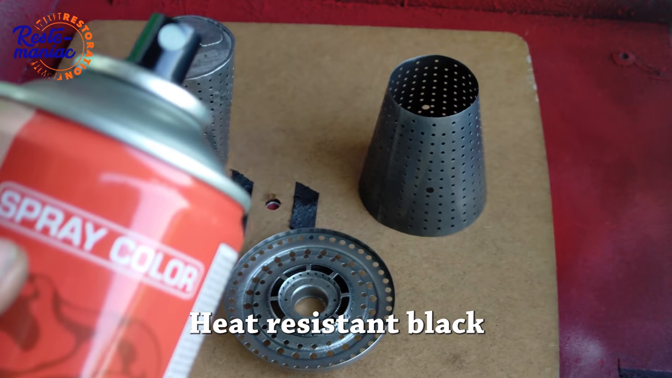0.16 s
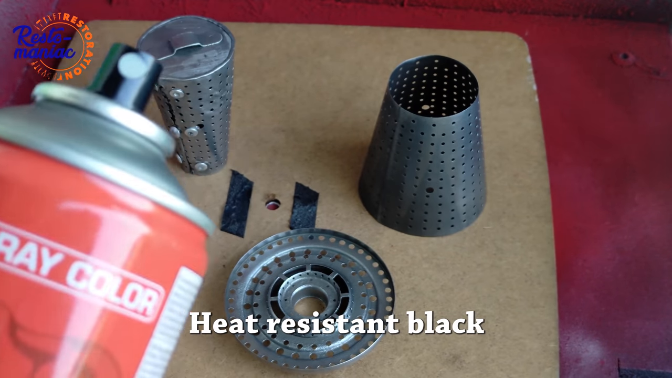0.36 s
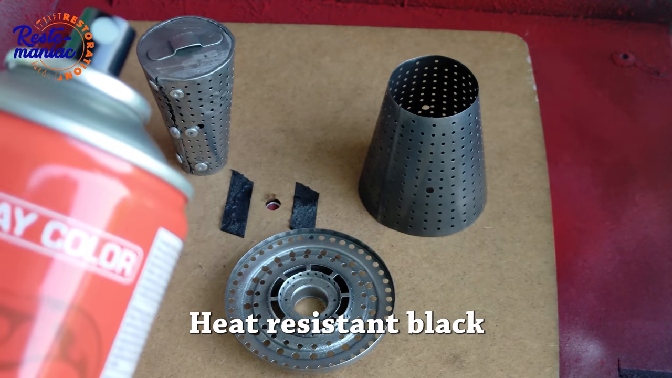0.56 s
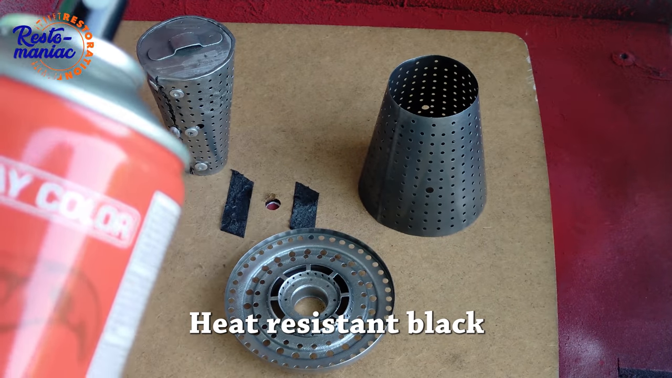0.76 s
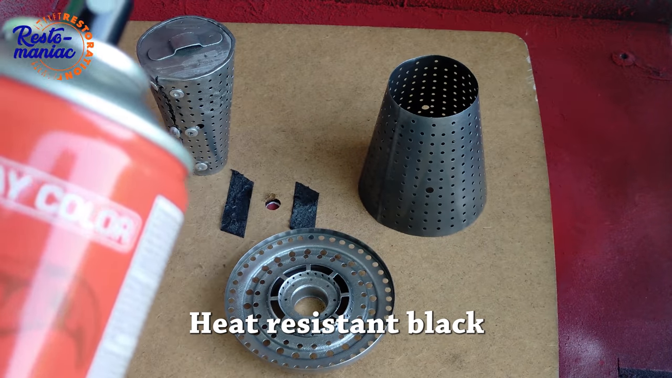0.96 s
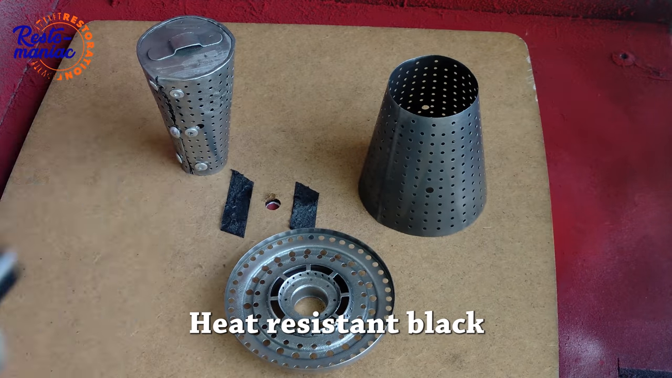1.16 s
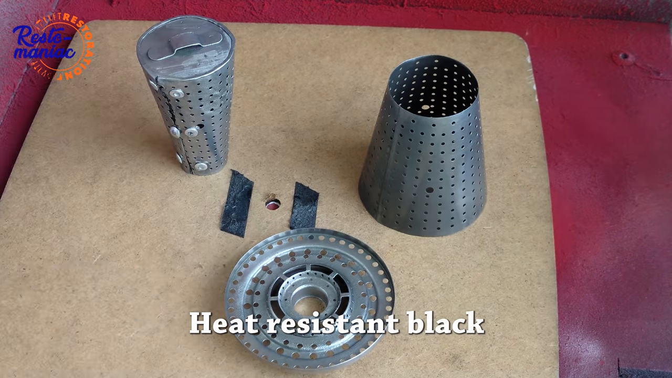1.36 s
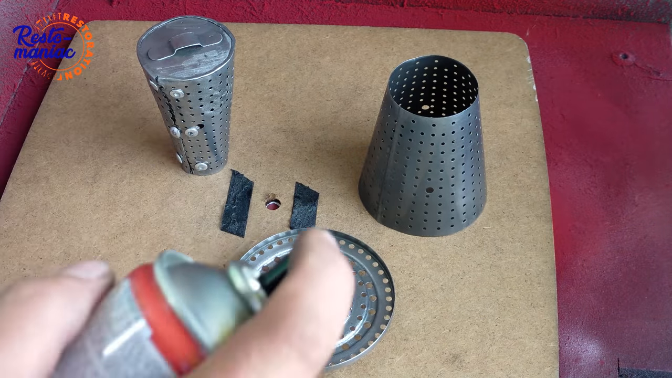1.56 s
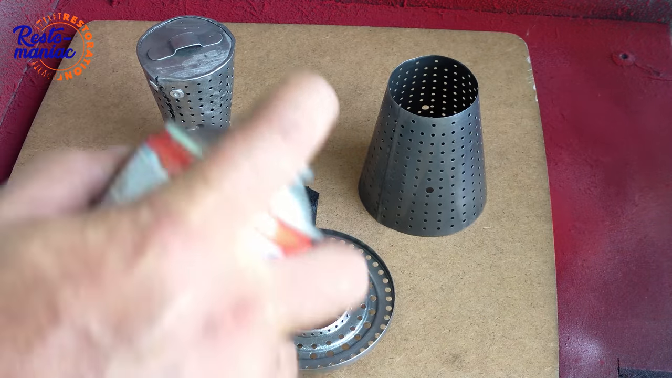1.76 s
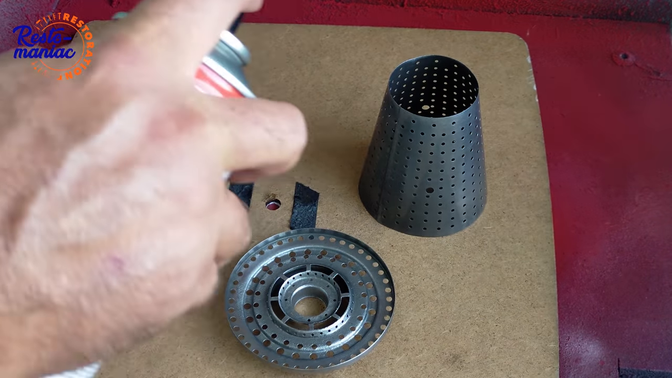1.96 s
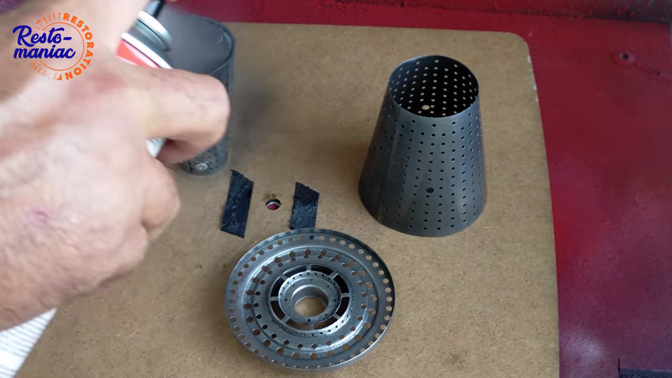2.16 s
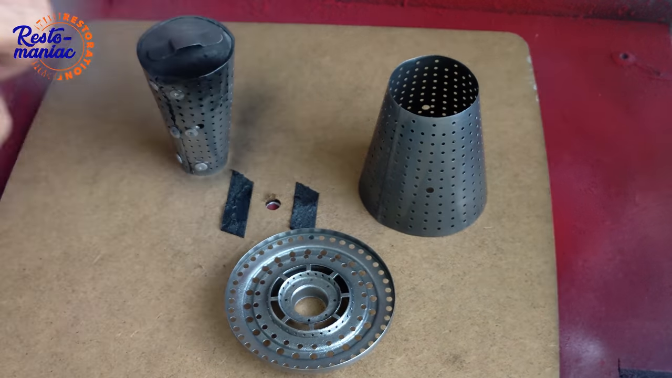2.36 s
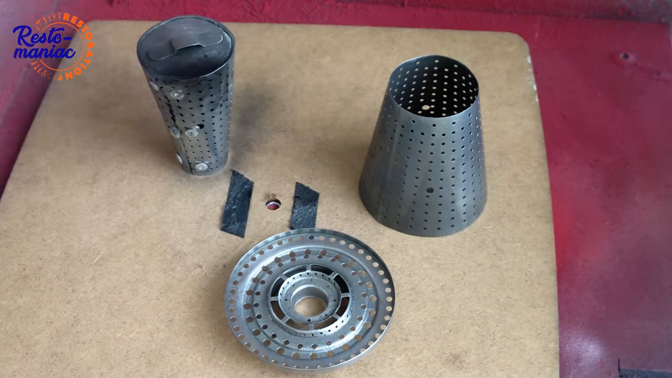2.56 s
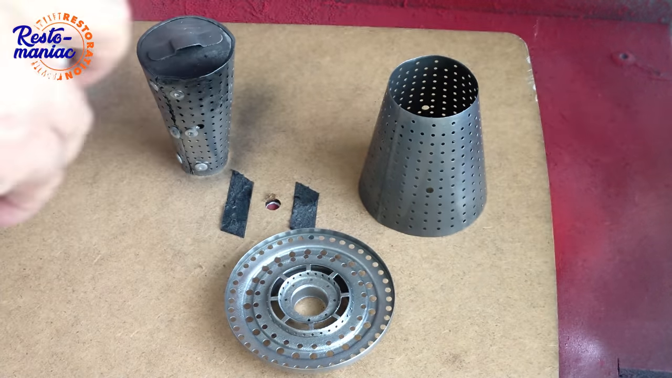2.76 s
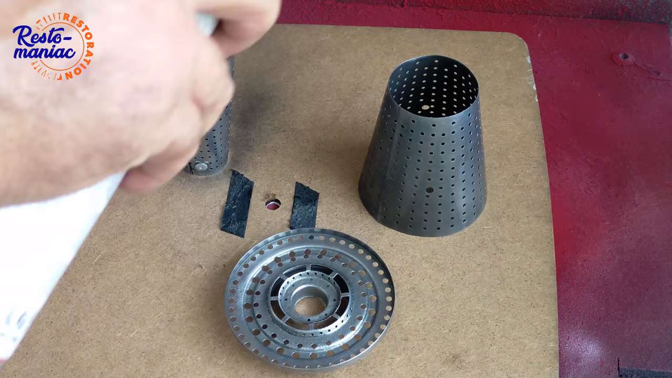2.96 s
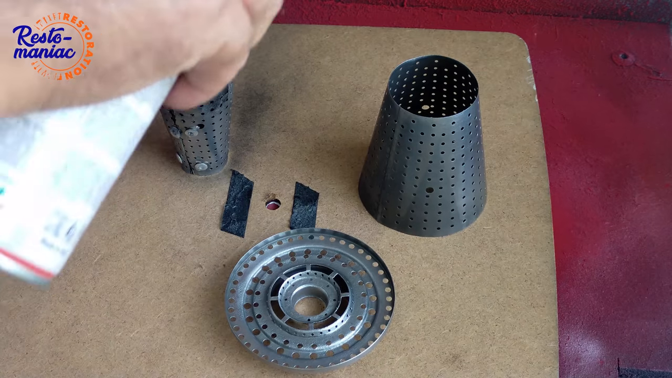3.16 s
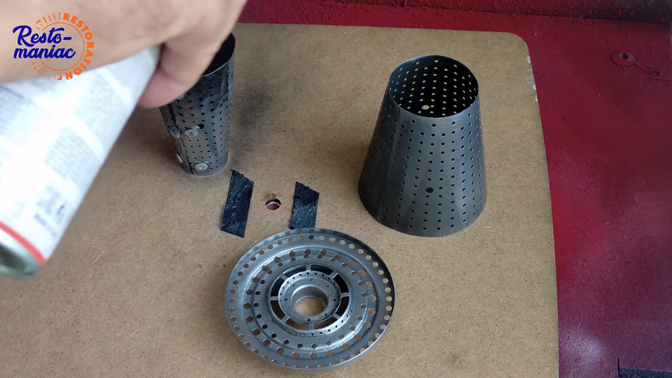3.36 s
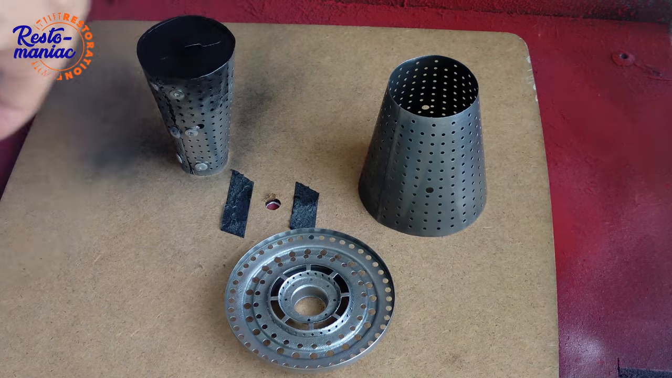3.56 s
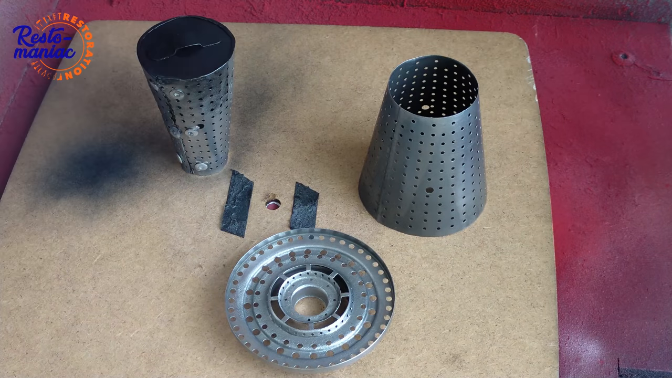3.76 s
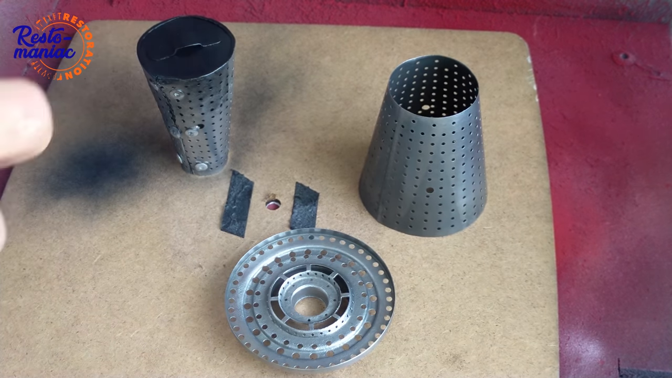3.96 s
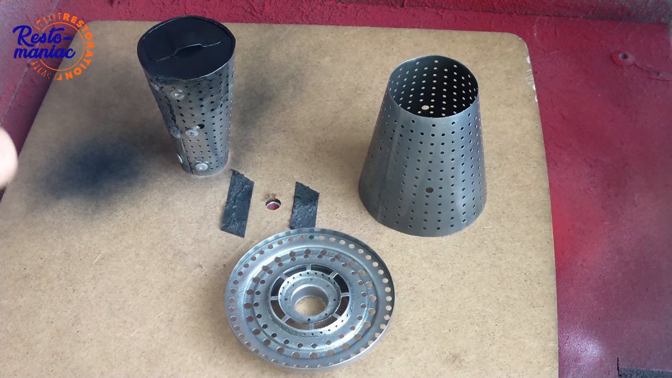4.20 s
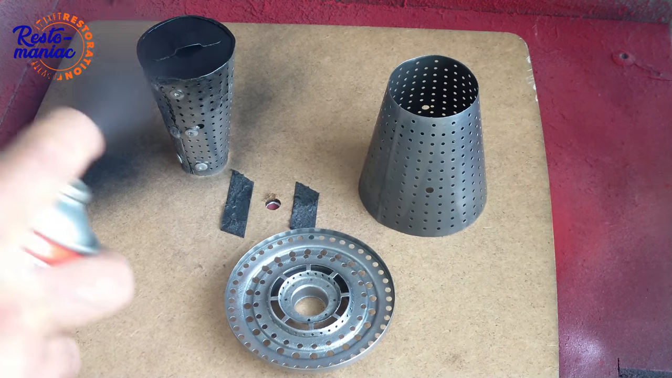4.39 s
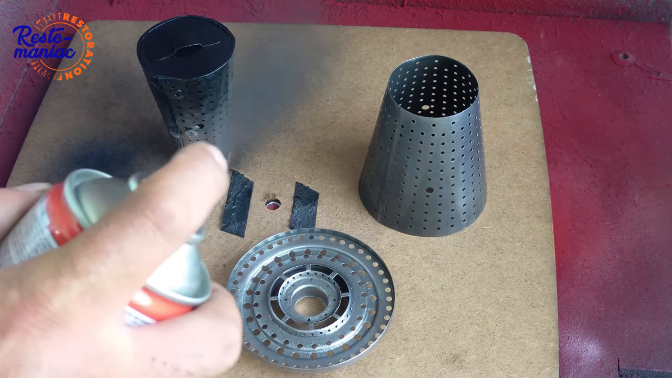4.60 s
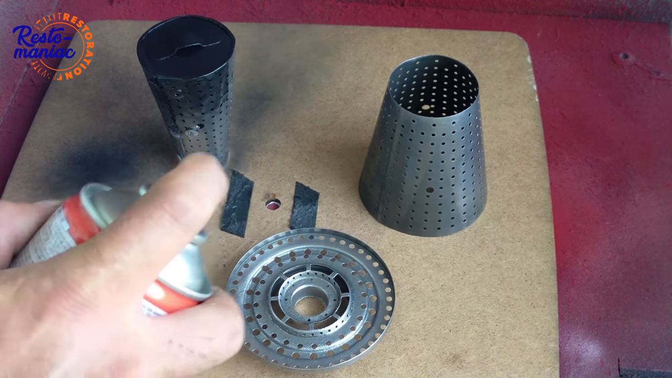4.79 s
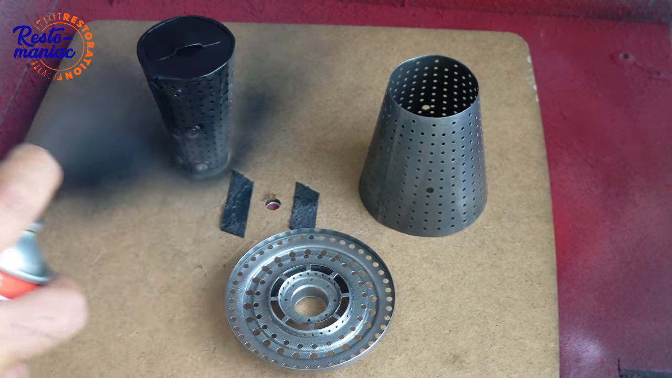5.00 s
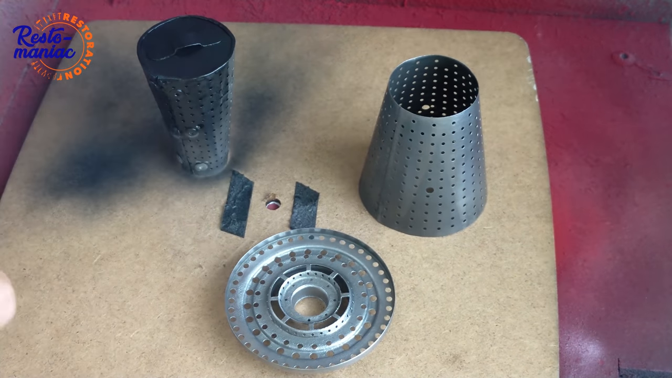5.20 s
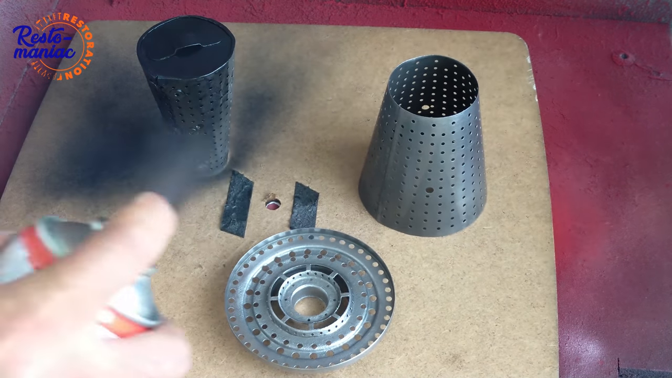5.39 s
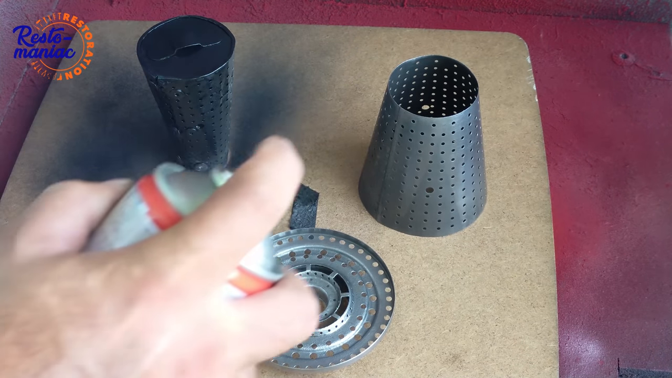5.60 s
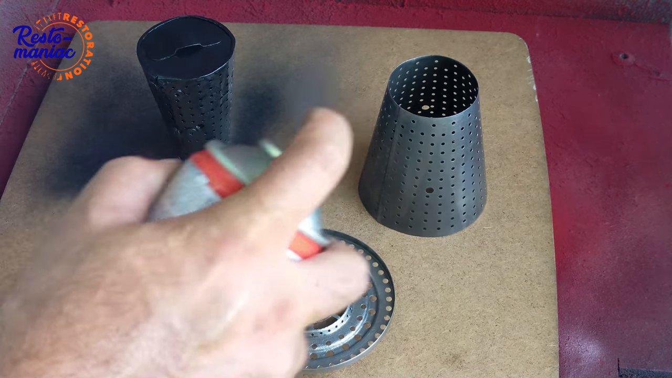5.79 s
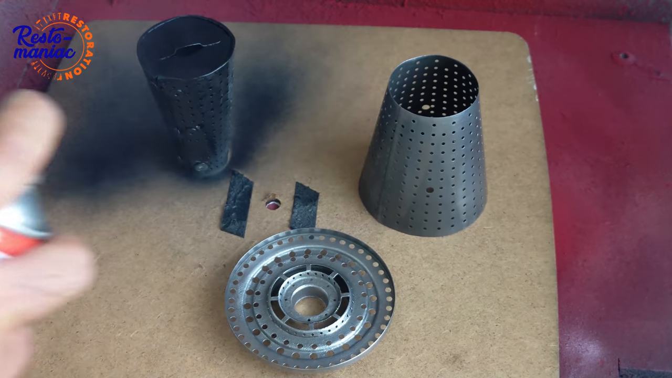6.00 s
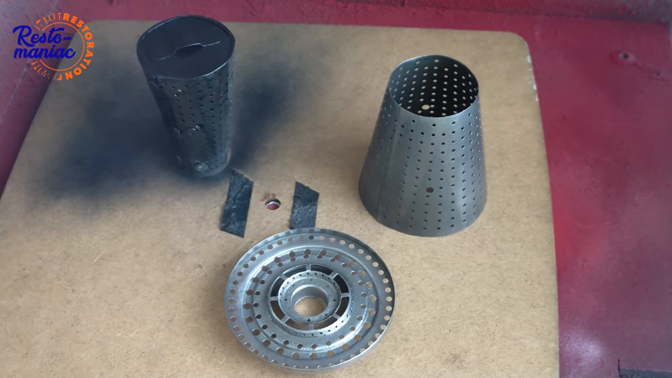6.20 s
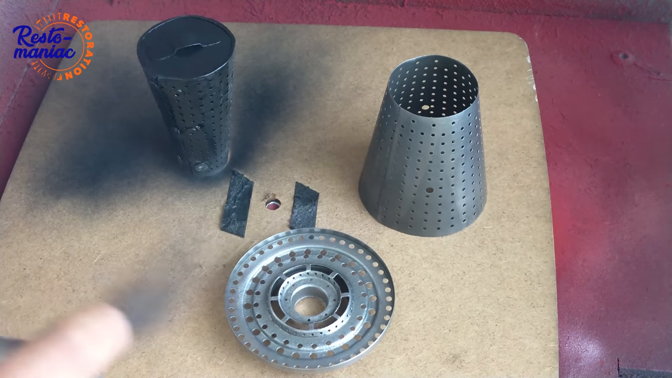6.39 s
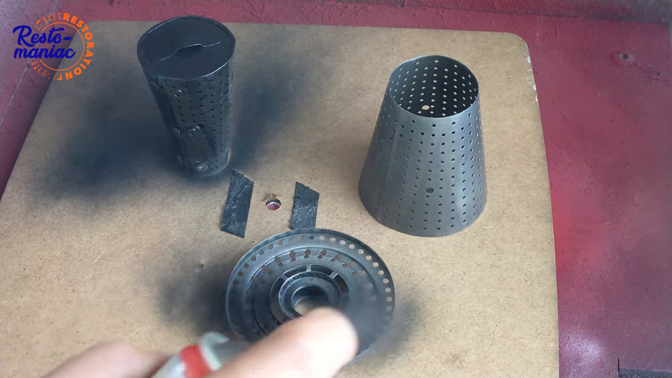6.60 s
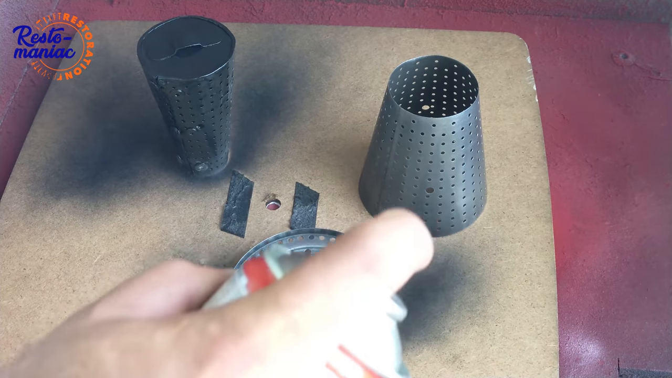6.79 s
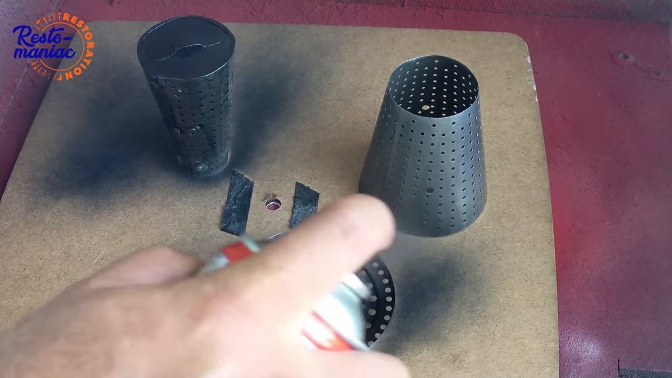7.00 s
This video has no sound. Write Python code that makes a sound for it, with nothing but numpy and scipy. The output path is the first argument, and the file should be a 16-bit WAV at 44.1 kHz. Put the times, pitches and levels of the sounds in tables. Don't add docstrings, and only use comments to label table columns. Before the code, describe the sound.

In a still workshop, a shaken aerosol can rattles briefly, then hisses in eight short bursts, separated by faint finger rubs and small clicks.

```python
import sys
import numpy as np
from scipy import signal
from scipy.fft import rfft, irfft
from scipy.io import wavfile
from scipy.ndimage import uniform_filter1d, map_coordinates

SR = 44100
rng = np.random.default_rng(int(sys.argv[2]) if len(sys.argv) > 2 else 0)


def file_out(sig):
    cols = np.atleast_2d(sig).T
    lim = np.clip(cols, -1, 1)
    pcm = np.round(lim * 32767).astype(np.int16)
    wavfile.write(sys.argv[1], SR, pcm)


def ratio_of_db(decibels):
    return 10 ** (np.asarray(decibels, float) / 20)


N = 310905
TIME = np.arange(N) / SR
STEPS = TIME[::16]


def fine(gain):
    return np.interp(TIME, STEPS, gain)


def curve(rows):
    return np.interp(TIME, *np.transpose(rows))


def unit(x):
    return x / np.sqrt(np.mean(x ** 2))


def noise(shape, lo_hz, hi_hz, slope=8):
    f = np.arange(N // 2 + 1) * SR / N + 0.0092
    hz, db = np.transpose(shape)
    colour = ratio_of_db(np.interp(np.log(f), np.log(hz), db))
    edges = 1 / np.sqrt((1 + (lo_hz / f) ** slope) * (1 + (f / hi_hz) ** slope))
    return unit(irfft(rfft(rng.standard_normal(N)) * colour * edges, N))


def walk(rate):
    hold = int(SR / rate)
    levels = np.repeat(rng.standard_normal(N // hold + 1), hold)
    return unit(uniform_filter1d(uniform_filter1d(levels, hold), hold)[:N])


def ring(hz, t60, length):
    t = np.arange(length) / SR
    return np.sin(2 * np.pi * hz * t) * np.exp(-np.log(1000) * t / t60)


def highpass(x, order, hz):
    return signal.sosfilt(signal.butter(order, hz, "highpass", fs=SR, output="sos"), x)


# opens t/s, finger lets go t/s, opening time t/s, flow level/dB, drift start to end level/dB
PRESSES = [
    (2.541, 2.945, 0.06, -40.5, 3),
    (3.192, 3.54, 0.032, -38.5, 1.5),
    (3.83, 4.164, 0.035, -43, -2),
    (4.722, 5.06, 0.039, -41, 1),
    (5.277, 5.526, 0.035, -38, 0),
    (5.723, 5.983, 0.035, -38, -3.5),
    (6.215, 6.419, .027, -40.5, -4.5),
    (6.793, 7.2, 0.036, -39, 2.5),
]
SPITS_DB = [5.2, 3.7, 4.5, 0.86, 2.5, 0.8, 4.1, .8]
SPIT_S = 0.024
SHUT_DB, OPEN_CURVE, CLOSE_CURVE, CLOSE_S = -29.5, 1.48, 1.35, 0.049
GAS_LEADS_DB, GAS_STOPS_DB = 8, -8


def valve():
    flow, spit_db, gas_db = np.zeros((3, len(STEPS)))
    for (opens, lets_go, stroke, db, drift_db), wet_db in zip(PRESSES, SPITS_DB):
        opening = np.clip(1 - (STEPS - opens) / stroke, 0, 1) ** OPEN_CURVE
        closing = np.clip((STEPS - lets_go) / CLOSE_S, 0, 1) ** CLOSE_CURVE
        held_db = db + drift_db * ((STEPS - opens) / (lets_go - opens) - .5)
        inside = (STEPS > opens) & (closing < 1)
        flow += inside * ratio_of_db(np.clip(held_db, -90, 0) + SHUT_DB * (opening + closing))
        spit_db += wet_db * np.exp(-((STEPS - opens - stroke) / SPIT_S) ** 2)
        gas_db += inside * (GAS_LEADS_DB * opening + GAS_STOPS_DB * closing)
    return fine(flow), fine(spit_db), fine(gas_db)


SCATTER_GAIN, SCATTER_MS, SCATTER_DRIFT_MS = 0.26, 4.5, 0.0883


def scatter(x, count):
    lags_ms = SCATTER_MS * rng.random(count) ** 1.5 + .5
    treble = highpass(x, 2, 4200)
    moved = []
    for ms in lags_ms:
        drift_ms = SCATTER_DRIFT_MS * (walk(9) + 2 * walk(2.5))
        moved.append(np.arange(N) - (ms + drift_ms) * SR / 1000)
    return x + SCATTER_GAIN * map_coordinates(treble, [moved], order=2).sum(axis=0)


# f/Hz, level/dB per Hz
NOZZLE = [(9500, -17.5), (11500, -14.5), (13000, -10.5), (14200, -6.5), (14900, -1.5), (15550, 3.5),
          (15780, -0.5)]
# f/Hz, level/dB per Hz
JET = [(180, -52), (300, -46), (337, -23.5), (572, -29.5), (1040, -21), (1330, -20.5), (1650, -17.5),
       (2220, -16), (4170, -17.5), (5440, -17), (7210, -17.5), (8280, -9), (9240, -15.5), (11500, -12),
       (15700, 5)]
# t/s, gained level/dB
AIM = [(2.64, 2), (2.7, 2.5), (2.74, -2), (2.88, 4.5), (2.94, -6), (3.39, 0), (3.44, 4), (3.48, 0.5),
       (3.88, -1), (3.91, -11), (3.945, 1.5), (4.15, -1), (5.05, 1), (5.39, 2.5), (5.44, 3), (5.51, 2.5),
       (6.8, 1), (7.05, 2.5)]
# t/s, level/dB gained by the splash
NEAR = [(2.6, -1.5), (2.66, -1.5), (2.9, -1.5), (3.22, -2.5), (3.28, -6.5), (3.42, 2), (3.55, -1.5),
        (3.9, -5), (4.17, -1), (4.76, .6), (5.0, 4.5), (5.32, 1.5), (5.52, -2), (5.76, 1), (5.95, 2.5),
        (6.25, 2), (6.43, 1.1), (7.05, 1.5)]
# lag as a multiple of the board's, gain, dulled above f/Hz
ECHOES = [
    (1.01, 0.27, 9200),
    (.37, -0.16, 9600),
    (2.3, 0.02, 6700),
]
EDGE_DB, PLUME_DB, SPLASH_DB = -5, -7, -11.5
EDGE_AIM, PLUME_AIM, PLUME_NEAR = .25, .1, .3
BOARD_LAG_MS, LAG_MS_PER_DB = 1.506, 0.07


def spray():
    flow, spit_db, gas_db = valve()
    aim_db, near_db = curve(AIM), curve(NEAR)
    sputter_db = 0.62 * walk(160) + 0.6 * walk(35)

    hiss_db = aim_db + gas_db + sputter_db + .6 * walk(25) + 1.3 * walk(450)
    edge_db = EDGE_DB + EDGE_AIM * aim_db + .4 * spit_db + .45 * gas_db + .9 * sputter_db + .7 * walk(25)
    plume_db = PLUME_DB + PLUME_AIM * aim_db + PLUME_NEAR * near_db + .9 * spit_db
    plume_db = plume_db + 0.51 * sputter_db + 0.18 * walk(24.12)
    splash_db = SPLASH_DB + near_db + spit_db + 1.62 * sputter_db + 0.4 * walk(16)

    hiss = noise(NOZZLE, 13000, 15700, slope=40) * ratio_of_db(hiss_db)
    edge = noise(NOZZLE, 10000, 13600, slope=38) * ratio_of_db(edge_db)
    plume = noise(JET, 6010, 10580, slope=17.2) * ratio_of_db(plume_db)
    splash = noise(JET, 250, 4770, slope=27) * ratio_of_db(splash_db)
    jet = flow * (hiss + edge + plume + splash)

    out = jet.copy()
    lag_ms = BOARD_LAG_MS + LAG_MS_PER_DB * near_db
    for share, gain, dull_hz in ECHOES:
        lag = np.clip(share * lag_ms + 0.056 * walk(4), .05, 8) * SR / 1000
        dull = signal.lfilter(*signal.butter(2, min(dull_hz, 20000), fs=SR), jet)
        out += gain * map_coordinates(dull, [np.arange(N) - lag], order=2)
    return scatter(out, count=5) * ratio_of_db(-1.5)


# t/s, wall thud level/dB, dome ring level/dB, top tick level/dB, ring time factor
CLACKS = [(1.489, -57.5, -69, -74, 1.4), (2.04, -64, -56, -76, 1.7), (2.163, -30, -41, -35.5, 0.94),
          (2.174, -56, -22, -44, 0.93), (2.181, -34, -43, -28, 1.26), (2.244, -42, -39.5, -54, 3),
          (2.253, -42.5, -38.5, -58, 0.99), (2.346, -34.5, -38.5, -38, 1.1), (2.368, -47, -44, -57, 1.8),
          (2.439, -50.5, -50, -51, 1.2), (4.404, -58.5, -64, -61, 1.3), (4.419, -49.5, -55, -48, 1),
          (5.132, -60, -59, -66, 1.3), (6.701, -73, -72, -61, 1.05), (6.719, -76, -72, -70, 1.05)]
# f/Hz, level/dB, t60 t/s
CAN = [(1400, -7, .035), (1915, -4, .05), (2270, -8, .035), (3284, -4, .035), (3655, -5, .03),
       (4124, -5, .03), (7650, -7, .025), (8285, -5, .03), (8780, -6, .025), (12200, -5, .025),
       (15400, -6, .025)]
# f/Hz, level/dB per Hz
RATTLE = [(180, -60), (300, -29), (563, -52), (852, -12), (1550, -27), (1890, -8.5), (2460, -17),
          (3260, -9.5), (4170, -14), (5810, -17.5), (8100, -7), (9550, -17), (15700, -16)]


def clacks():
    out, length = np.zeros(N + SR), SR // 4
    t = np.arange(length) / SR
    for lo_hz, hi_hz, column in ((650, 4400, 1), (5600, 10000, 2), (10000, 17000, 3)):
        rattle = np.resize(noise(RATTLE, lo_hz, hi_hz, slope=6.8), N + SR)
        for row in CLACKS:
            start = int((row[0] + 0.000805) * SR)
            factor = np.clip(row[4], .3, 2.5)
            modes = np.zeros(length)
            for hz, db, t60 in CAN:
                if lo_hz <= hz < hi_hz:
                    strength = ratio_of_db(db + 2.1 * rng.standard_normal())
                    detuned_hz = hz * (1 + 0.0031 * rng.standard_normal())
                    modes += strength * ring(detuned_hz, t60 * min(factor, 1.3), length)
            fade = np.exp(-t / (0.0075 * factor)) + 2.3 * np.exp(-t / 0.0005)
            fade *= 1 - np.exp(-t / 0.00027)
            blow = 0.38 * modes + 0.42 * fade * rattle[start:start + length]
            out[start:start + length] += ratio_of_db(row[column]) * blow
    return highpass(out[:N], 6, 720)


# t/s, length t/s, cloth level/dB, fall level/dB, fingertips over cloth level/dB
RUBS = [(1.485, 0.046, -64, 9.5, -1.5), (1.507, 0.28, -72.5, 10.5, 1.5), (1.652, .06, -77.5, 4, -7),
        (1.858, 0.14, -84, -7, -10), (2.04, .03, -84, 8, 15), (2.078, 0.091, -85, -9, -3),
        (2.448, .1, -70.5, 12, -1), (2.99, 0.19, -70.5, 4.5, 4.5), (3.586, 0.31, -71.5, 12.5, 0.5),
        (4.194, 0.25, -72, -2, 1.5), (4.412, .11, -64, 14, -4), (4.53, 0.22, -80, 3, 0.5),
        (5.112, 0.2, -72, 0, 5), (5.551, .16, -68, 7.5, 6), (6.02, 0.043, -69.5, 2, -1),
        (6.065, 0.16, -62.5, 2.5, -3.5), (6.445, .12, -67.5, 2, 1.5), (6.566, 0.13, -69.5, 9.5, -0.5),
        (6.694, 0.091, -73.5, 5.5, 4)]
RUB_ATTACK_S, RUB_RELEASE_S = 0.0044, 0.013


def rubs():
    cloth, fingers = np.zeros((2, len(STEPS)))
    for s, length, db, fall_db, finger_db in RUBS:
        attack = (STEPS - s) / RUB_ATTACK_S
        release = (s + length - STEPS) / RUB_RELEASE_S + 1
        gate = np.clip(np.minimum(attack, release), 0, 1)
        gain = gate * ratio_of_db(db - fall_db * np.clip((STEPS - s) / length, 0, 1))
        cloth = np.hypot(cloth, gain)
        fingers = np.hypot(fingers, gain * ratio_of_db(finger_db))
    return fine(cloth), fine(fingers)


# f/Hz, level/dB per Hz
RUSTLE = [(150, -7), (400, -8.5), (850, -6.5), (1250, -9), (1750, -8.5), (2600, -9.5), (3400, -17),
          (5300, -21.5), (7000, -17.5), (8300, -14), (9500, -19.5), (12500, -17.5), (15500, -14)]


def rustle():
    cloth_gain, finger_gain = rubs()
    cloth = noise(RUSTLE, 276, 4700) * ratio_of_db(1.4 * walk(40))
    fingers = noise(RUSTLE, 4100, 25500) * ratio_of_db(1.5 * walk(84))
    return cloth_gain * cloth + finger_gain * fingers


# t/s, pitch f/Hz, level/dB
WHISTLES = [
    [(4.36, 10500, -80), (4.375, 10500, -76), (4.395, 10600, -73), (4.41, 10400, -84)],
    [(6.05, 8400, -86), (6.1, 8950, -81), (6.16, 9800, -82), (6.195, 10050, -73), (6.225, 10100, -60)],
]


def whistles():
    out = np.zeros(N)
    for rows in WHISTLES:
        s, hz, db = np.transpose(rows)
        gate = uniform_filter1d(((TIME >= s[0]) & (TIME <= s[-1])) * 1., size=400)
        pitch = np.interp(TIME, s, hz) * (1 + 0.01 * walk(200))
        level_db = np.interp(TIME, s, db) + 2.2 * walk(120)
        out += gate * ratio_of_db(level_db) * np.sin(2 * np.pi * np.cumsum(pitch) / SR)
    return out


# t/s, length t/s, f/Hz, width f/Hz, rms level/dB
STREAKS = [
    (6.07, 0.099, 844, 90, -64.5),
    (6.07, 0.078, 1900, 49, -62.5),
    (6.075, 0.17, 3230, 70, -72.5),
    (6.075, 0.11, 2100, 45, -69),
    (4.7, 0.24, 2530, 410, -74),
    (4.3, 0.18, 2450, 200, -82),
    (2.575, 0.054, 1780, 110, -54),
]


def streaks():
    out = np.zeros(N + SR)
    for s, length, hz, width_hz, db in STREAKS:
        u = np.arange(int(length * SR)) / (length * SR)
        driven = np.convolve(rng.standard_normal(SR), ring(hz, 3.5 / width_hz, SR // 8))
        band = unit(driven[SR // 8:SR // 8 + len(u)])
        envelope = np.minimum(u / 0.3, 1) * np.sqrt(1 - u ** 2)
        out[int(s * SR):int(s * SR) + len(u)] += ratio_of_db(db) * band * envelope
    return out[:N]


# t/s, peak level/dB, f/Hz, spread t/s
TAPS = [(0.304, -71, 3050, .015), (1.138, -68.5, 3050, 0.027), (1.29, -72, 804, 0.013),
        (1.485, -53, 1560, 0.013), (1.486, -59, 3000, 0.015), (1.979, -66, 2060, 0.02),
        (3.04, -59.5, 970, 0.066), (3.685, -68, 8000, .006), (3.72, -66, 8200, .006),
        (4.228, -55, 8100, .012), (4.28, -60, 8200, .012), (4.365, -62, 617, 0.014),
        (4.443, -66, 346, 0.015), (4.439, -60.5, 202, 0.019), (6.351, -62, 344, 0.024),
        (2.255, -45, 1870, 0.011), (4.404, -58, 8200, .005), (4.418, -43.5, 8400, 0.012),
        (4.417, -54, 12150, .009), (4.418, -52.5, 7000, 0.009)]


def taps():
    out, length = np.zeros(N + SR), SR // 4
    for s, db, hz, spread in TAPS:
        push = rng.standard_normal(length) * np.exp(-np.arange(length) / SR / spread)
        knock = np.convolve(push, ring(hz, 28 / hz, SR // 8))[:length]
        out[int(s * SR):int(s * SR) + length] += ratio_of_db(db) * knock / np.abs(knock).max()
    return out[:N]


# f/Hz, level/dB per Hz
SHOP = [(120, -33), (200, -8), (260, -10.5), (800, -10), (1700, -12), (3000, -17), (3600, -19), (5600, -25),
        (7200, -23), (8300, -18.5), (9400, -24.5), (11800, -25), (13000, -31), (15700, -20)]
# f/Hz, level/dB per Hz
RUMBLE_TONE = [(4.7, -50.5), (8.0, 4), (16, 3.5), (32, -13.5), (65, -6), (130, -18.5), (170, -23.5),
               (220, -46), (370, -120)]
# t/s, rumble level/dB
ARM = [(0.0, -72.5), (1.08, -70.5), (1.37, -74.5), (1.49, -66), (1.79, -70.5), (3.12, -63), (3.18, -74),
       (3.26, -66.5), (4.63, -67), (4.75, -70.5), (5.06, -66), (6.26, -61), (6.93, -67.5), (7.05, -67)]
# t/s, hum level/dB, spread t/s
BUFFETS = [
    (1.52, -93, 0.075),
    (2.24, -84, 0.058),
    (2.79, -83, 0.071),
    (3.36, -75, 0.035),
    (4.4, -76.5, .12),
    (6.14, -68, .04),
    (6.33, -64.5, 0.061),
    (7.0, -61.5, 0.032),
]
SHOP_DB = -77.5
HUM_DB, HUM_ARM, HUM_FLOW_DB = -13, 0.89, -39


def shop():
    air = noise(SHOP, 140, 17000) * ratio_of_db(SHOP_DB + 0.21 * walk(2.33))
    arm_db = curve(ARM)
    rumble = noise(RUMBLE_TONE, 2.4, 165) * ratio_of_db(arm_db + 4.5)
    rest_db = arm_db.min()
    arm_hum = ratio_of_db(rest_db + HUM_DB + HUM_ARM * (arm_db - rest_db))
    flow_hum = ratio_of_db(HUM_FLOW_DB) * valve()[0]
    buffet = fine(sum(ratio_of_db(db) * np.exp(-((STEPS - s) / spread) ** 2) for s, db, spread in BUFFETS))
    hum = noise([(150, -6.5), (200, 1.5), (240, -7.0), (400, -7.0)], 170, 406)
    return air + rumble + hum * (arm_hum + flow_hum + buffet)


ROOM_T60_S, ROOM_DB, WALL_DULL_HZ = 0.15, -14, 7000


def walls(near):
    t = np.arange(SR // 2) / SR
    tail = rng.standard_normal(len(t)) * np.exp(-np.log(1000) * t / ROOM_T60_S) * (t > .004)
    tail = signal.lfilter(*signal.butter(1, WALL_DULL_HZ, fs=SR), tail)
    return ratio_of_db(ROOM_DB) * signal.fftconvolve(near, tail / np.sqrt(np.sum(tail ** 2)))[:N]


def scene():
    near = spray() + rustle() + clacks() + whistles() + taps() + streaks()
    return np.tile(near + walls(near) + shop(), (2, 1))


MUTE_DB = -112


def mute_faint(x):
    hz, _, frames = signal.stft(x, SR, nperseg=2048)
    for lo_hz, hi_hz in ((12000, 13000), (13000, 14100), (14100, 15000), (15000, 16000)):
        band = (hz >= lo_hz) & (hz < hi_hz)
        loudest = np.abs(frames[band]).max(axis=0)
        frames[band] *= np.clip((loudest / ratio_of_db(MUTE_DB)) ** 12, 0, 1)
    return signal.istft(frames, SR, nperseg=2048)[1][:N]


def low_pass(x):
    return signal.sosfilt(signal.butter(12, 17110, fs=SR, output="sos"), x)


TOP_HZ = 15720


def record(dry):
    mid = mute_faint(dry[0])
    low_mids = signal.butter(2, [130, 650], "bandpass", fs=SR, output="sos")
    stray = signal.sosfilt(low_mids, np.roll(mid, 700))
    ports = mid + ratio_of_db(-32) * np.array([stray, -stray])
    cut = signal.sosfilt(signal.ellip(16, .2, 85, TOP_HZ, fs=SR, output="sos"), ports)
    return low_pass(cut)


dry = scene()
out = record(dry)
file_out(out)
```